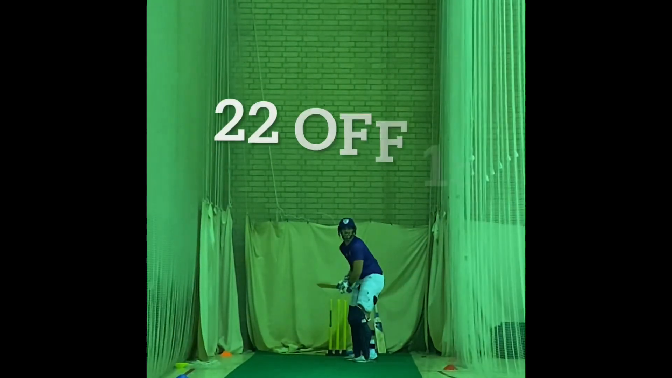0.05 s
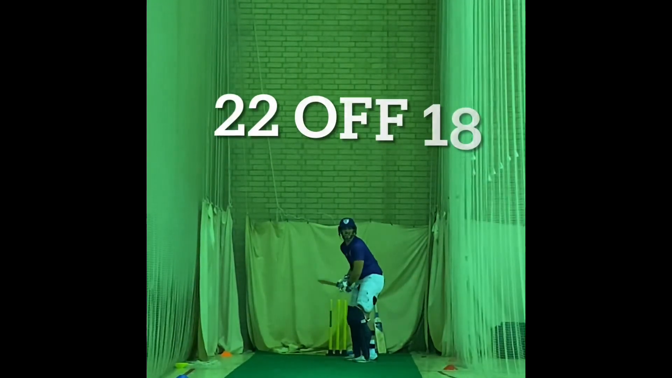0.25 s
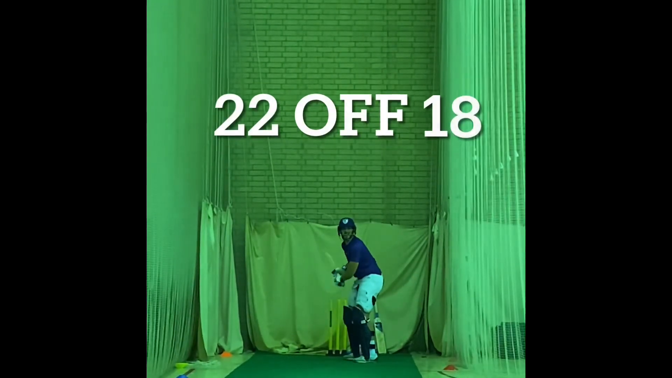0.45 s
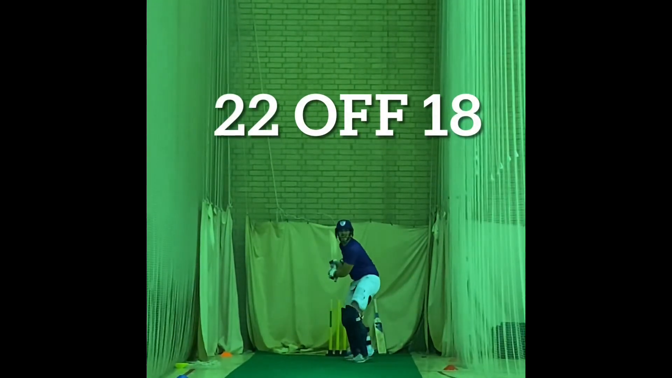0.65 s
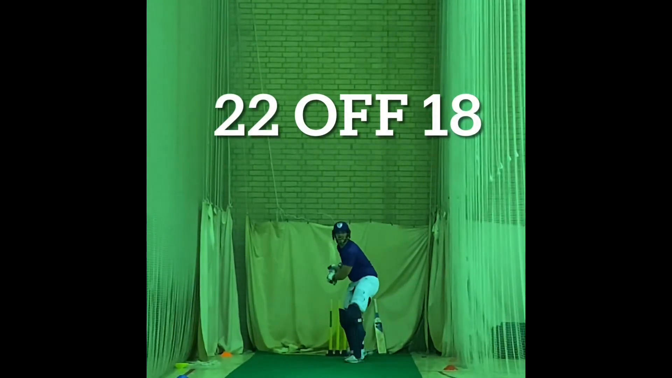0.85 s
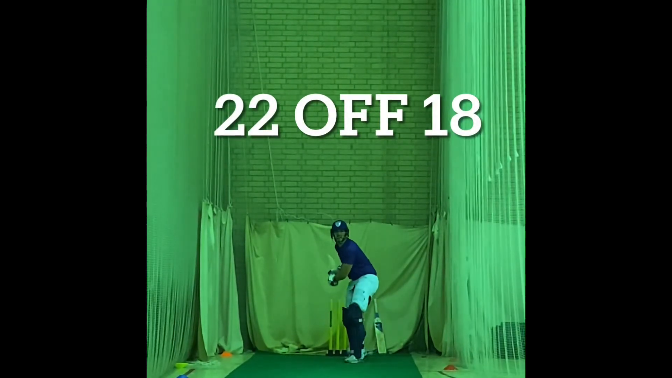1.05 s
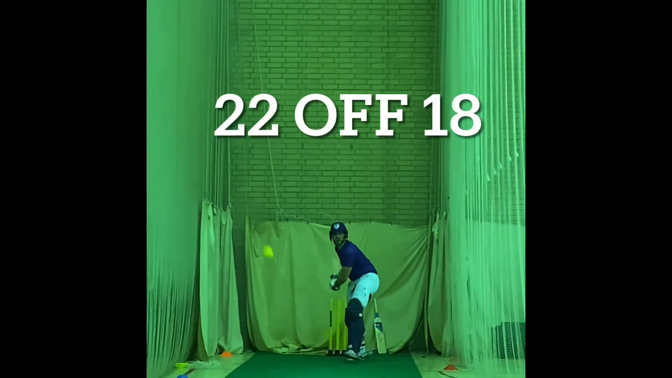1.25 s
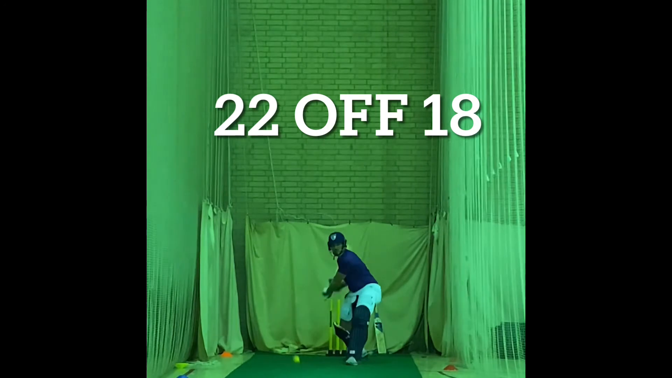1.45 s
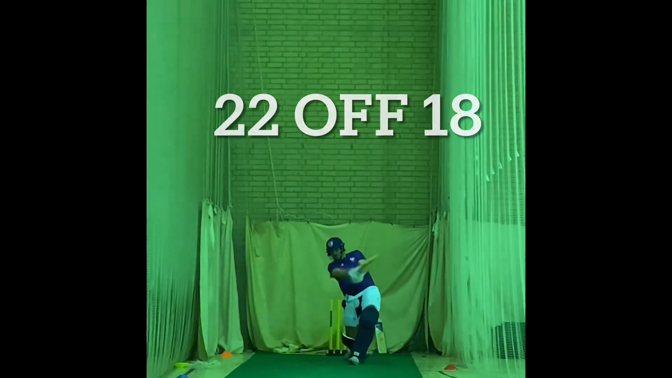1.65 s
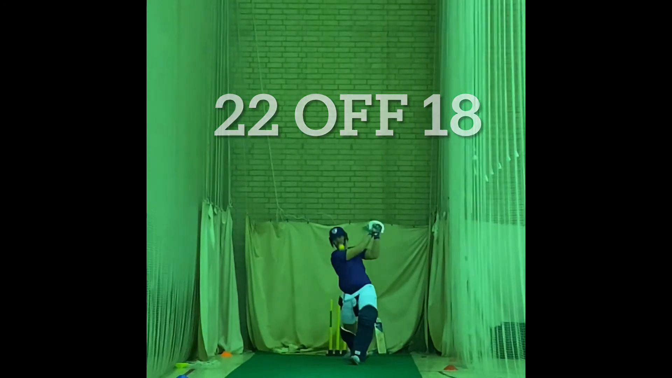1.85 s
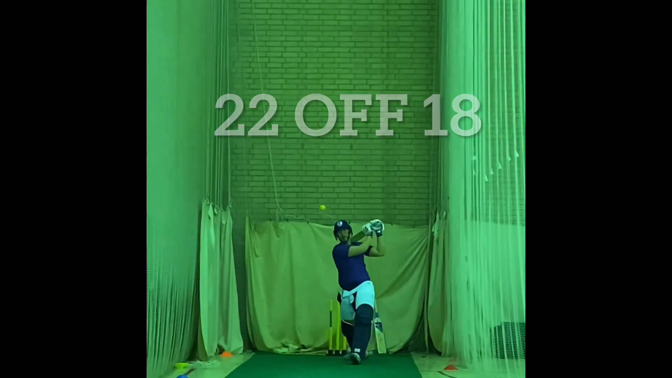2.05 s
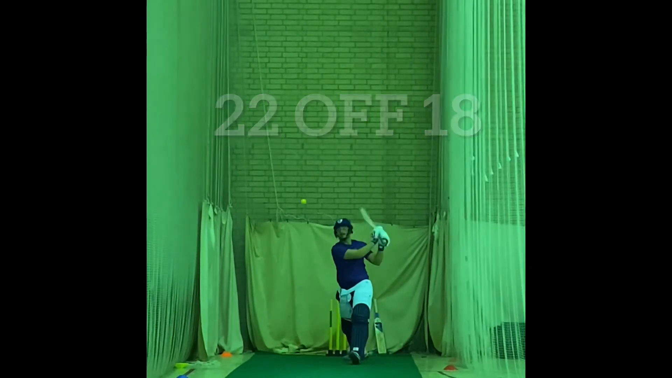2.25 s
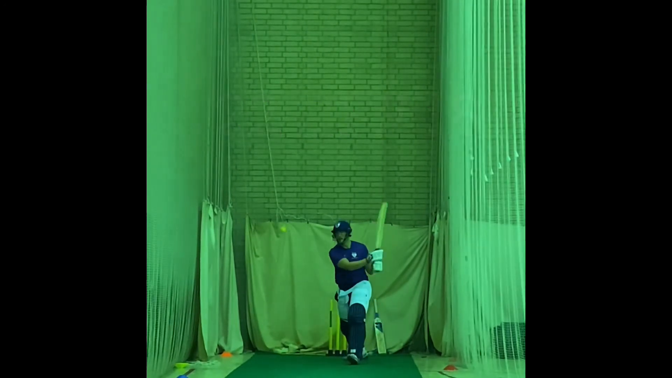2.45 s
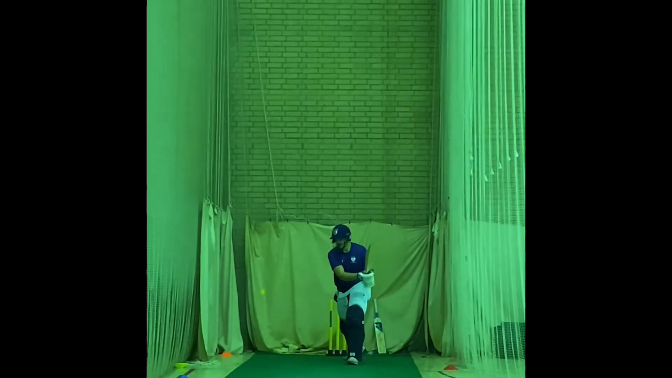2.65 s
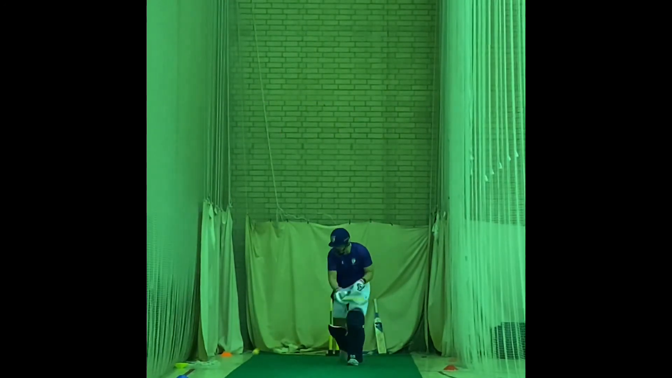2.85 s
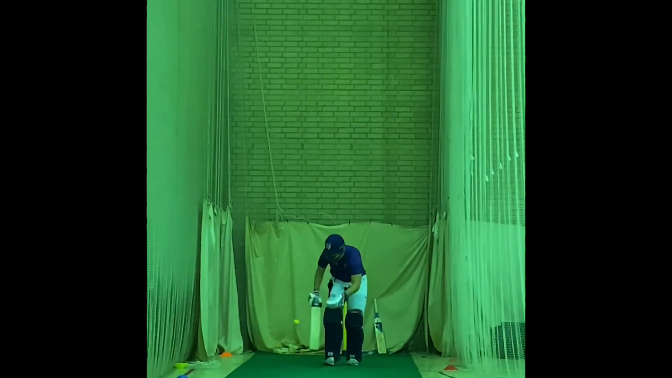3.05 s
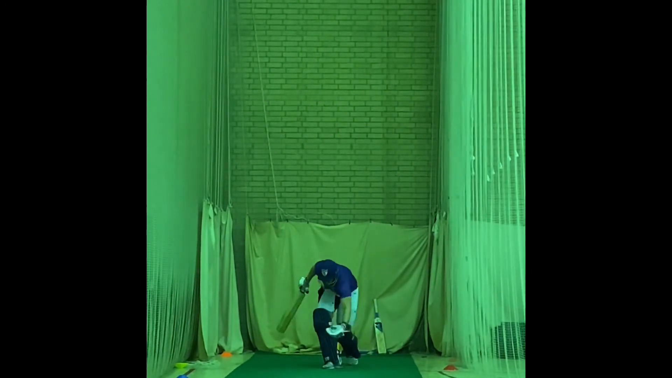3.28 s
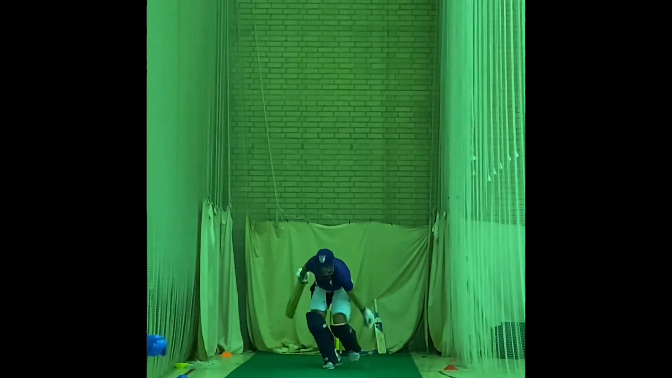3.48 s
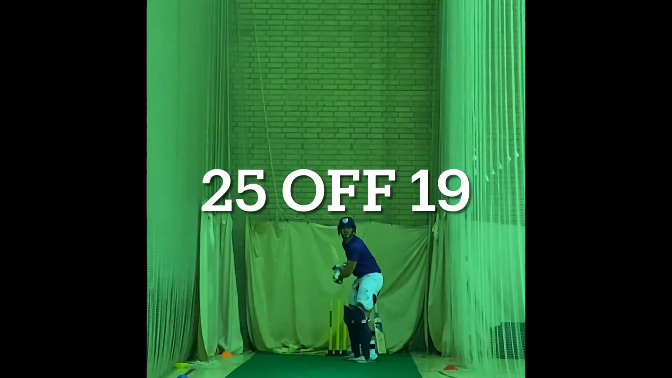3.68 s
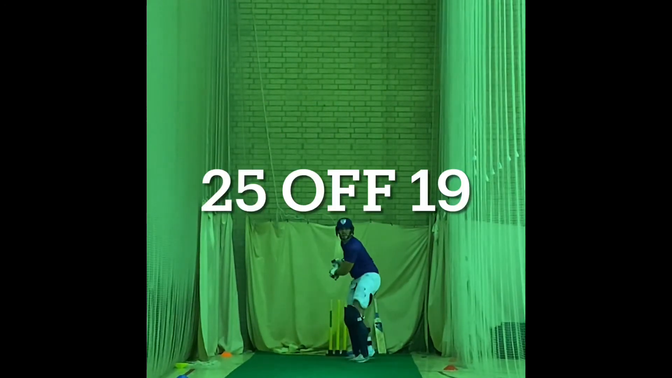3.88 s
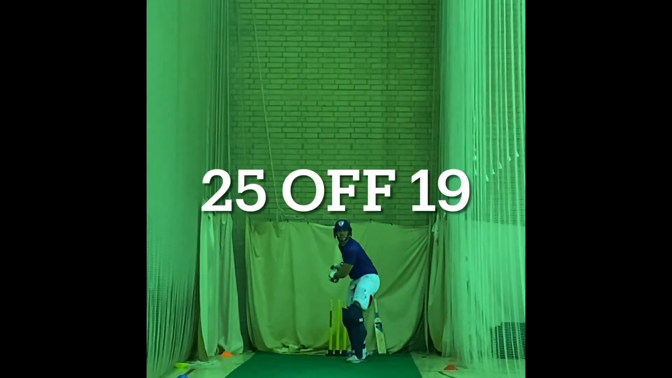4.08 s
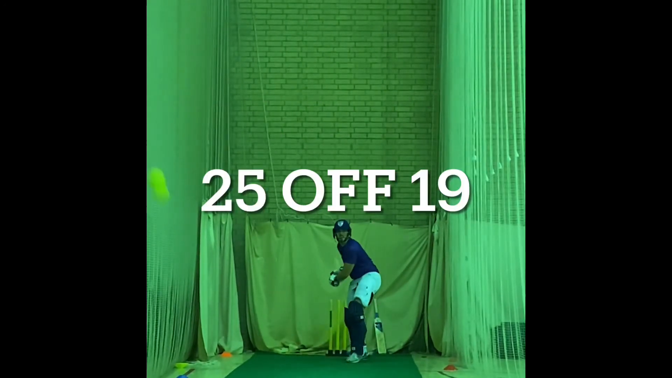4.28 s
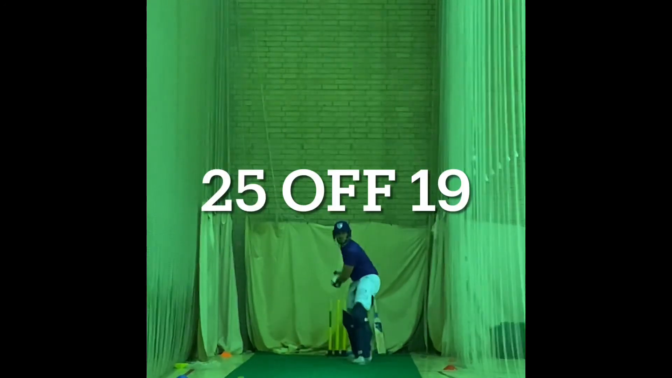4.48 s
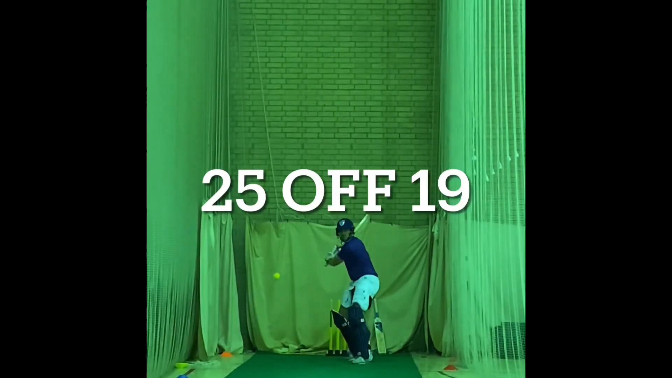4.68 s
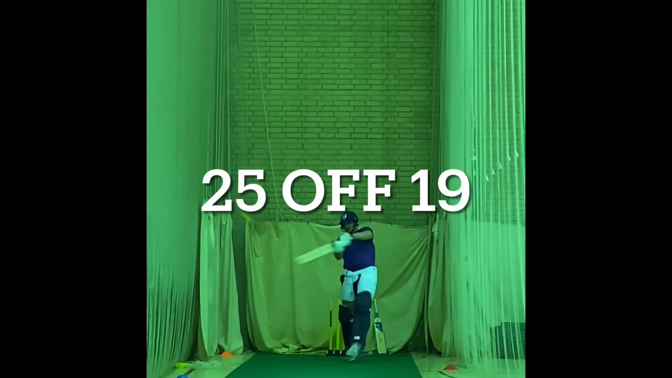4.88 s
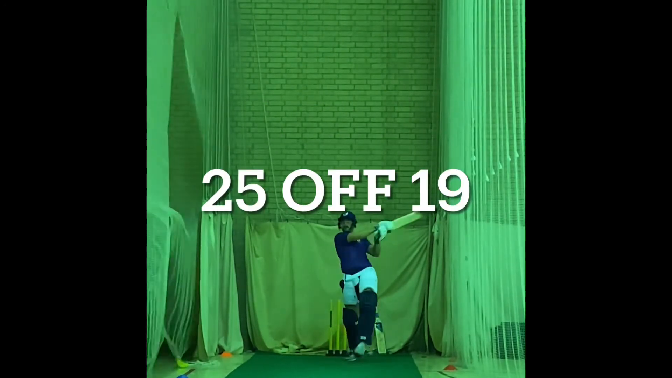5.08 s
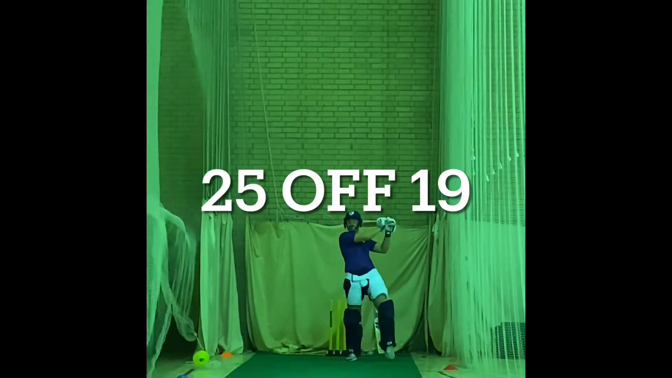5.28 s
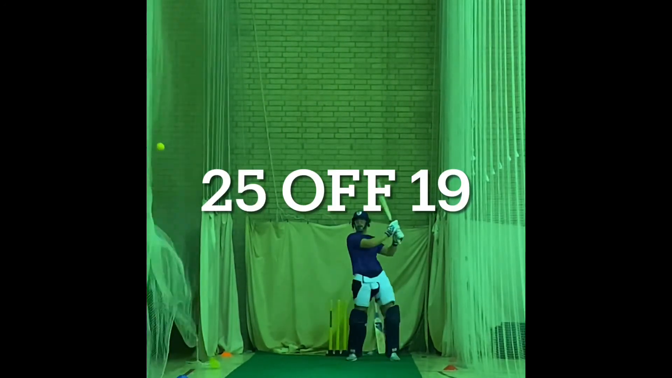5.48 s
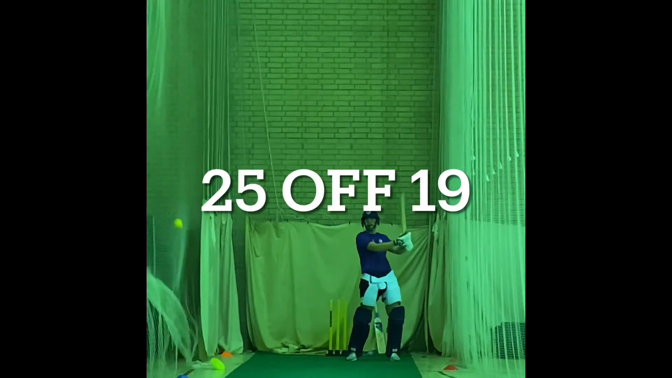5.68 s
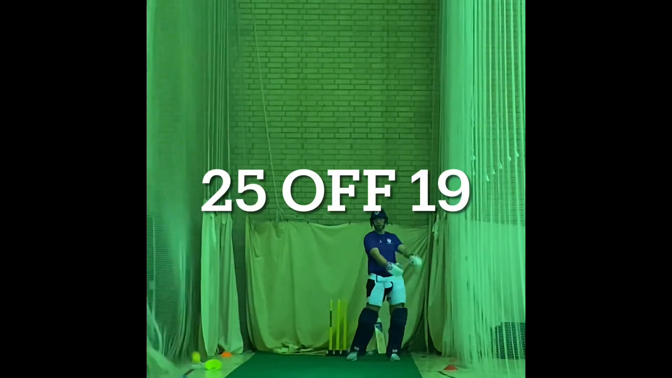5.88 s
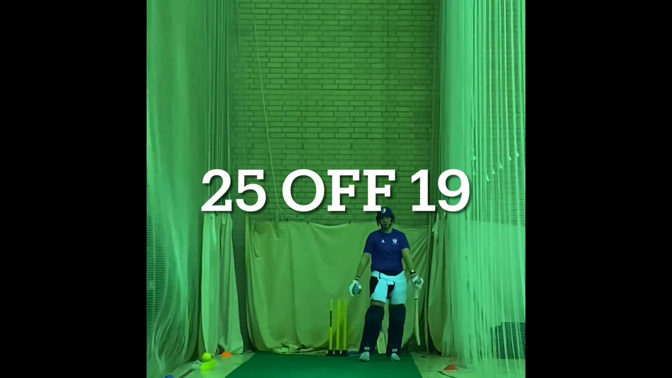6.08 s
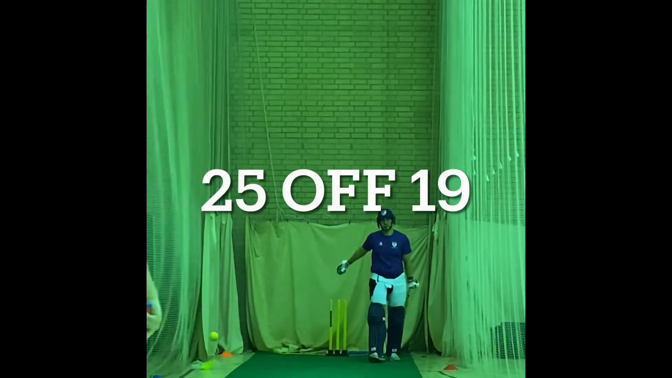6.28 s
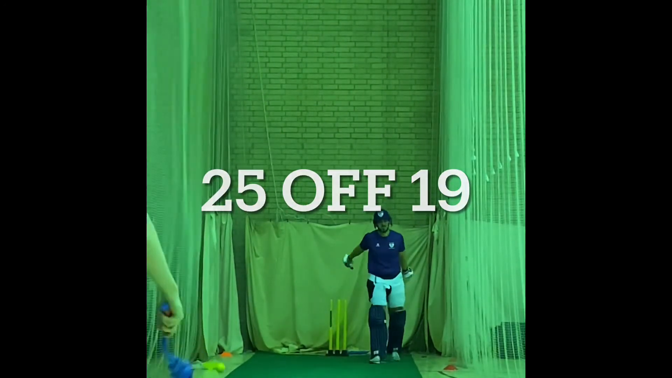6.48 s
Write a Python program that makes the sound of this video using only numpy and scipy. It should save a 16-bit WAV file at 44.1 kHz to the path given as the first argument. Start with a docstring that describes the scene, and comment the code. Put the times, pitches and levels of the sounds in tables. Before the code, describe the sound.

Two cricket shots in an indoor net lane, heard in stereo from down the lane. Gritty shoe taps precede each; a hollow floor thud, then a dry, woody crack that slaps off the walls and lingers for seconds. The first echo is cut short by a brief fade; the second shot is brighter and stronger, followed by net runners whirring and hollow floor knocks over a wavering hum.

```python
"""Cricket nets in an echoing hall

Two deliveries in a big sports hall, joined by a quick fade: a willow bat cracks as ringing blade modes
and clicks; feet and ball thud on a sprung floor that spreads each blow out by pitch, and low booms follow.
Shoes tap and scuff as gritty noise bursts; after the second shot the side net's runners whirr.
Decaying stereo noise makes the hall's slaps and long ring; a wavering hum and a rush of air lie beneath."""
import sys
import numpy as np
from scipy import signal
from scipy.fft import rfft, irfft, next_fast_len
from scipy.io import wavfile
from scipy.ndimage import uniform_filter1d, minimum_filter1d, map_coordinates

SR = 44100
rng = np.random.default_rng(int(sys.argv[2]) if len(sys.argv) > 2 else 0)


def digitize_waveform(pressure):
    """Quantize a signal to 16-bit integers and store it at the path in sys.argv[1].

    Rows of a 2-D input are taken as channels; values are limited to [-1, 1].
    """
    field = np.atleast_2d(pressure).T
    bounded = np.clip(field, -1, 1)
    quanta = np.round(bounded * 32767).astype(np.int16)
    wavfile.write(sys.argv[1], SR, quanta)


N = 287973
TIME = np.arange(N) / SR
SPLICE_S = 3.548  # the first delivery gives way to the second
CONTACT_S = .0002  # the ball flattens against blade or floor

# bat on ball: (time [s], blade level [dB], crack level [dB], signed distance from the sweet spot,
# echo level [dB], hollow ring in the echo [dB], echo tilt [dB per octave], end wall's delay [s],
# level of the clean returns [dB])
STROKES = [(1.4767, -4.2, -14.5, 1.3, -21.6, 1.5, -1.6, .0195, -2),
           (4.7741, -1.5, -12, 0, -20, 6.5, -.3, .0166, .5)]


def stroke(blade_db, crack_db, off_centre, echo_db, hollow_db, tilt, wall_s, mirror_db,
           snap_db=8, snap_tilt=1.3, splinter_db=-2, splinter_t60=.011):
    """A hard crack and the short ring of the blade's bending modes, doubled by the floor and the hall."""
    # bending modes: (pitch [Hz], level [dB], t60 [s], rise [s], gain per unit off the sweet spot [dB])
    modes = [(362, 12, .024, .0045, -5), (700, 2, .022, .002, 3), (1000, -7, .018, .0006, -2),
             (1290, -5.5, .018, .0007, -7), (2150, -14, .01, .0003, -2), (2750, -10, .009, .0003, 0),
             (3770, -10, .01, .0003, 7), (4350, -1, .008, .0005, 2), (4900, -9, .01, .0003, 3),
             (5710, -7, .01, .0003, -6), (6200, -18, .01, .0003, 3)]
    # spectrum of the crack: (frequency [Hz], level [dB per Hz])
    crack_spectrum = [(200, -18), (800, -4), (2500, -5), (4400, 0), (6000, -3), (8000, -12), (12000, -12),
                      (16000, -17)]
    # spectrum of the bat's echo: (frequency [Hz], level [dB per Hz])
    bat_echo = [(60, -30), (115, -25), (170, -6), (350, 0), (750, 0), (1050, -3), (1300, -7.5), (1700, -9),
                (2400, -5.5), (3100, -10), (4200, -7), (5600, -9.5), (7500, -16), (11000, -20),
                (15000, -29)]
    # clean returns: (time after the end wall's delay [s], blade level [dB], crack level [dB])
    mirrors = [(0, -12, -3), (.0025, -11, -1), (.0042, -14, -2), (.0066, -16, -3), (.0105, -20, -7),
               (.0482, -15, -4)]
    floor_s, floor_db = .0027, -4  # the crack's bounce off the floor

    t = np.arange(SR // 10) / SR
    blade = np.zeros(len(t))
    for hz, db, t60, rise, shift_db in modes:
        envelope = decay(t, t60) * (1 - np.exp(-(t / rise) ** 2))
        blade += amp(db + off_centre * shift_db) * np.sin(2 * np.pi * hz * t) * envelope

    splinter_envelope = decay(t, splinter_t60) * (1 - np.exp(-t / CONTACT_S))
    splinters = amp(splinter_db) * splinter_envelope * noise(len(t), colour(crack_spectrum))
    click = amp(snap_db) * snap(len(t), colour(crack_spectrum, snap_tilt))
    crack = amp(crack_db) * (click + splinters)

    hollow = resonant(colour(bat_echo, tilt), 750, hollow_db)
    out = amp(echo_db) * echo(lambda hz: hollow(hz) * uneven(hz),
                              slap_db=0, early_db=1.5, early_t60=.55, wall_s=wall_s)
    add(out, 0, amp(blade_db) * blade + crack)
    add(out, floor_s, amp(floor_db) * crack)
    for delay, ring_db, click_db in mirrors:
        bounce = amp(blade_db + ring_db) * blade + amp(click_db) * crack
        add(out, wall_s + delay, amp(mirror_db) * bounce)
    return out


def thud(knock_db, echo_db, tilt, knock_hz, boom_db, sole_db, spread=.19):
    """Bending waves in a sprung floor run faster at high pitch, so the boom arrives ms after the knock."""
    # spectrum of the knock: (frequency [Hz], level [dB per Hz])
    knock_spectrum = [(30, -35), (70, -5), (140, -1), (330, 0), (550, -8), (850, -24), (1500, -44),
                      (4000, -75), (15000, -120)]
    # spectrum of the boom in the hall: (frequency [Hz], level [dB per Hz])
    boom_spectrum = [(30, -42), (55, -12), (85, 1), (115, 2.5), (150, 1), (280, -1.7), (420, -7),
                     (600, -13), (850, -29), (1300, -44), (2400, -57), (9000, -92)]
    # spectrum of the sole's slap: (frequency [Hz], level [dB per Hz])
    slap_spectrum = [(200, -10), (550, -2), (900, 0), (1400, -1), (2200, -6), (3200, -9.5), (5500, -16),
                     (8000, -32), (11000, -39), (15000, -57)]
    boom_hz, knock_lift_db = 95, 6  # the floor's deep boom; the resonance lifted in each knock
    far_wall_s, far_wall_db = .062, -14  # the far wall returns each thud
    slap_trim_db, echo_slap_db = 1, 2  # added to the sole's level nearby and in the echo
    slap_rise_s = .0025  # the soft rubber takes this long to flatten

    n = SR // 4
    hz, t = np.fft.rfftfreq(n, 1 / SR), np.arange(n) / SR
    boards = resonant(colour(knock_spectrum, tilt), knock_hz, knock_lift_db, width=.3)
    # the delay shrinks with the root of the frequency
    dispersion = np.exp(-2j * np.pi * (2 * spread * np.sqrt(hz) - .003 * hz))
    knock = irfft(boards(hz) * dispersion, n)
    attack = 1 - np.exp(-(t / CONTACT_S) ** 2)
    fade_out = np.minimum(1, 2 * (1 - t / t[-1])) ** 2
    knock *= attack * fade_out / np.abs(knock).max()

    slap_envelope = t / slap_rise_s * np.exp(1 - t / slap_rise_s)
    slap = amp(sole_db + slap_trim_db) * noise(n, colour(slap_spectrum)) * slap_envelope

    deep = resonant(colour(boom_spectrum, tilt), boom_hz, boom_db, width=.35)

    def boom_and_slap(f):
        return np.hypot(deep(f), amp(sole_db + echo_slap_db) * colour(slap_spectrum)(f))
    out = amp(echo_db) * echo(boom_and_slap, slap_db=-12, early_db=1.5, early_t60=1.2)
    add(out, 0, amp(knock_db) * (knock + slap))
    add(out, far_wall_s, amp(knock_db + far_wall_db) * (knock + slap))
    return out


def blows():
    """Strokes, thuds and low booms with their echoes; the first delivery's echo ends at the splice."""
    # thuds on the floor, and low booms that follow some of them as probable returns off the walls;
    # the first is only a fading echo: (time [s], knock level [dB], echo level [dB],
    # tilt [dB per octave], knock pitch [Hz], lift of the deep boom [dB],
    # sole's slap before its trims [dB])
    thuds = [(-1.2, -12, -28.5, -2.6, 300, -3, -66), (1.389, -13, -25, -2.3, 300, 3, -30),
             (1.496, -3.5, -16.2, -.5, 380, 0, -58), (1.585, -9, -30, -3, 100, 0, -60),
             (1.657, -7, -29, -2, 170, 0, -60), (1.828, -13, -36, -2, 200, 0, -60),
             (2.7192, -8, -22.8, -1, 420, -1, -66), (2.797, -12, -34, -2, 160, 0, -60),
             (4.3513, -2, -19.7, 0, 330, -3, -32), (4.431, -9.5, -28, -3, 140, -2, -50),
             (5.8525, -5.5, -23.3, -.1, 300, 1, -25), (5.953, -13, -30, -2, 140, 2, -55),
             (6.095, -15, -35, -2, 180, -4, -55)]
    first, second = np.zeros((2, 2, N))
    for source, rows in (stroke, STROKES), (thud, thuds):
        for s, *blow in rows:
            add(first if s < SPLICE_S else second, s, source(*blow))
    return np.where(TIME < SPLICE_S, first, second)


def shoes(grit_db=2.2, slip_db=2.8, clap_db=7, wet_db=-11.5):
    """Rubber soles tap and slide in gritty slips; the runner's weight lands just after each tap."""
    # steps, heel and toe: (time [s], tap level [dB], footfall level [dB], clap pitch [Hz], t60 [s])
    steps = [(.006, -37, -39, 850, .07), (.388, -41, -46, 2300, .1), (.414, -35.5, -30, 2000, .1),
             (.728, -34.5, -35, 1100, .075), (.787, -49, -38, 2600, .085), (.862, -35, -48, 1400, .1),
             (1.222, -37, -34, 1700, .06), (1.268, -34, -31, 900, .09), (3.583, -40.5, -40, 1000, .06),
             (3.601, -41, -31, 1200, .085), (3.859, -49, -36, 1000, .06), (3.915, -39, -42, 1700, .085),
             (4.064, -32.5, -52, 1300, .075), (4.328, -41, -45, 900, .085), (4.343, -36, -33, 1200, .085)]
    # sliding soles and brushing cloth: (middle [s], level [dB], pitch [Hz], squeak at that pitch [dB],
    # tilt [dB per octave], half length [s])
    scuffs = [(.185, -58, 4200, 3, 3, .04), (.888, -39.5, 1600, 5.5, 1, .033),
              (2.745, -59, 4200, 3, 2, .025), (3.19, -60, 5200, 5, 2, .028), (3.44, -61, 3000, 3, 1.5, .03),
              (3.608, -47, 2700, 5, 1.3, .02), (3.881, -46.5, 5400, 17, 1, .012),
              (4.084, -40.5, 1400, 4, 1.4, .033), (5.924, -42.5, 4300, 10, -1.2, .011)]
    # small ticks of pads, gloves and laces: (time [s], level [dB], pitch [Hz])
    ticks = [(.243, -49, 4000), (.423, -40, 2400), (.661, -48, 2400), (.732, -39, 1900), (1.231, -39, 2600),
             (1.277, -36, 2300), (3.161, -53, 4200), (3.568, -38, 2300), (3.677, -47.5, 4300),
             (3.747, -42, 2900), (3.859, -44, 2000), (4.082, -39, 2700), (5.882, -44, 3600)]
    # spectrum of a sole: (frequency [Hz], level [dB per Hz])
    sole = [(200, -12), (550, -2.5), (900, .5), (1400, 0), (2200, -2.5), (3200, -8), (5500, -12.5),
            (7200, -25), (12500, -25), (15500, -29)]
    # spectrum of the landing weight: (frequency [Hz], level [dB per Hz])
    footfall = [(40, -25), (90, -6), (135, 0), (190, -9), (300, -28), (1000, -55), (4000, -85)]
    tap_rise_s, weight_s = .0018, .011  # a tap's attack; the weight peaks this long after it
    tick_t60_s = .035
    grains_per_s, grain_share = 1400, .35  # grit under the soles, and its share of their power
    # tilt is zero at the neutral pitch; brighten is dB per octave for each octave above it
    neutral_hz, brighten = 2100, 1.6

    dry, t = np.zeros(N), np.arange(SR // 6) / SR

    def rubber(hz, tilt, lift_db, rough_db):
        """Smooth friction noise mixed with sparse grains, its level shaken at random."""
        gain = resonant(colour(sole, tilt), hz, lift_db)
        hits = rng.random(len(t)) < grains_per_s / SR
        grains = unit(filtered(rng.standard_normal(len(t)) * hits, gain))
        friction = noise(len(t), gain)
        mix = np.sqrt(1 - grain_share) * friction + np.sqrt(grain_share) * grains
        return mix * amp(rough_db * wobble(t, 250))

    def clap(hz):
        """A sole's texture, brighter the higher its pitch."""
        return rubber(hz, brighten * np.log2(hz / neutral_hz), clap_db, grit_db)

    weight = t / weight_s * np.exp(1 - t / weight_s)
    for s, tap_db, foot_db, hz, t60 in steps:
        tap = decay(t, t60) * (1 - np.exp(-t / tap_rise_s)) * clap(hz)
        landing = weight * noise(len(t), colour(footfall))
        add(dry, s, amp(tap_db) * tap + amp(foot_db) * landing)
    middle = t.mean()
    for s, db, hz, lift_db, tilt, half_s in scuffs:
        slide = np.exp(-((t - middle) / half_s) ** 2)
        add(dry, s - middle, amp(db) * slide * rubber(hz, tilt, lift_db, slip_db))
    for s, db, hz in ticks:
        add(dry, s, amp(db) * decay(t, tick_t60_s) * clap(hz))

    hall = echo(np.ones_like, slap_db=-3, early_db=2, early_t60=.5)
    wet = signal.fftconvolve(dry[None], hall / np.linalg.norm(hall[0]), axes=1)[:, :N]
    return dry + amp(wet_db) * wet


def net(rattle_db=1.5):
    """The ball drags the side net, whose runners whirr along their wire as unevenly pulsing noise."""
    # the pull on the net: (time [s], level [dB])
    pull = [(4.9, -55), (5.02, -32.5), (5.32, -30), (5.7, -32.5), (6, -42), (6.5, -55)]
    # spectrum of the runners: (frequency [Hz], level [dB per Hz])
    runners = [(400, -40), (570, -14), (670, 0), (740, -3), (820, 0), (920, -9), (1200, -22), (1450, -13),
               (1750, -26), (4000, -48), (15000, -100)]
    level_db = np.interp(TIME, *np.transpose(pull), left=-120)
    return amp(level_db + rattle_db * wobble(TIME, 25)) * diffuse(N, colour(runners))


def ventilation(drift_hz=.35, waver_db=.8):
    """A fan hum of wandering pitch and level in a soft rush of air that swells around each stroke."""
    # hum before its waver: (time [s], level [dB])
    hum_level = [(0, -39), (1.3, -37), (3.4, -40), (4.2, -47), (5.6, -32.5), (6.5, -40.5)]
    # spectrum of the rush of air: (frequency [Hz], level [dB per Hz])
    air = [(20, -18), (45, -5.5), (70, 0), (110, -6.5), (200, -12), (350, -20), (600, -24), (1400, -30),
           (2800, -34), (4000, -36), (5600, -36.5), (7500, -48), (11500, -50), (16000, -64)]
    hum_hz, air_db = 70.3, -50.5
    swell_db, swell_rise_s, swell_fall_s = 6, 1.45, .6  # peaks at the stroke

    phase = 2 * np.pi * np.cumsum(hum_hz + drift_hz * wobble(TIME, 5)) / SR
    level_db = np.interp(TIME, *np.transpose(hum_level)) + waver_db * wobble(TIME, 5)
    hum = np.sqrt(2) * np.sin(phase) * amp(level_db)
    swell = sum(np.interp(TIME, [s - swell_rise_s, s, s + swell_fall_s], [0, 1, 0]) for s, *_ in STROKES)
    return hum + amp(air_db + swell_db * swell) * diffuse(N, colour(air))


def echo(gain, slap_db, early_db, early_t60, wall_s=.017, clump_db=1.9, merge_s=.6):
    """The hall's answer: wall slaps, a quick fall in the net lane, then a long tail that darkens."""
    # scattered slaps: (time after the end wall's delay [s], level over the tail [dB], t60 [s])
    walls = [(0, 7, .045), (.047, -3, .05)]
    # ring of the hall: (frequency [Hz], t60 [s])
    ring_times = [(70, 3.8), (100, 2.1), (122, 2.4), (170, 5), (260, 5.6), (420, 5.5), (700, 5), (1200, 4),
                  (2000, 3.15), (3200, 2.6), (5000, 1.9), (7000, 1.1), (9500, .76), (14000, .46)]
    build_up_db = -20  # the echo starts this low and grows until the end wall answers

    n = 5 * SR // 2
    t = np.arange(n) / SR
    # slaps and lane are powers relative to the tail
    slaps = sum((amp(db + slap_db) * decay(t - wall_s - delay, t60)) ** 2 for delay, db, t60 in walls)
    lane = (amp(early_db) * decay(t, early_t60)) ** 2
    # nets and drapes scatter ever more until the end wall answers
    build_up = amp(build_up_db * np.maximum(0, 1 - t / wall_s))
    # reflections come in bunches, then merge
    clumps = amp(clump_db * wobble(t, 250) / (1 + t / merge_s))
    reflections = diffuse(n, gain, build_up * clumps * np.sqrt(1 + lane + slaps))
    hz, frames, z = signal.stft(reflections, SR, nperseg=2048)
    ringing = z * decay(frames, along(ring_times, hz)[:, None])
    return signal.istft(ringing, SR)[1][:, :n]


def uneven(hz):
    """Gain of scattered narrow peaks that make the echo's treble uneven."""
    # peaks: (centre [Hz], lift [dB])
    peaks = [(1322, 3.5), (2338, 4.5), (2640, 3.5), (2755, 3), (2900, 3), (3108, 3), (3670, 3.5), (4030, 2),
             (4380, 2.5), (5190, 5.5), (5387, 3), (5790, 5)]
    peak_width_hz = 20
    return amp(sum(db / (1 + ((hz - centre) / peak_width_hz) ** 2) for centre, db in peaks))


def snap(n, gain):
    """A single sharp click of the given colour, its energy packed at the start, of peak 1."""
    cepstrum = irfft(np.log(gain(np.fft.rfftfreq(n, 1 / SR)) + 1e-6), n)
    # folding the cepstrum forward gives minimum phase
    fold = np.r_[1, np.full(n // 2 - 1, 2), np.zeros(n - n // 2)]
    click = irfft(np.exp(rfft(cepstrum * fold)), n)
    return click / np.abs(click).max()


def diffuse(n, gain, envelope=1):
    """Coloured stereo noise arriving from all sides, of rms 1 where the envelope is 1."""
    # stereo width: (frequency [Hz], side against mid [dB])
    side_level = [(60, -44), (95, -34), (160, -21), (450, -8), (750, -2.5), (1100, -2.5), (2000, -10.5),
                  (3300, -18), (4400, -6.5), (7400, -20), (15000, -14)]

    def split(hz):
        side = amp(along(side_level, hz))
        return unit(gain(hz)) * np.array([np.ones_like(side), side]) / np.hypot(1, side)
    mid, side = filtered(envelope * rng.standard_normal((2, n)), split)
    return np.array([mid + side, mid - side])


def noise(n, gain):
    """Coloured noise of rms 1."""
    return unit(filtered(rng.standard_normal(n), gain))


def wobble(t, rate):
    """A smooth random curve, rate knots a second."""
    return map_coordinates(rng.standard_normal(2048), [t * rate], mode="mirror")


def resonant(gain, centre_hz, db, width=.2):
    """A gain curve lifted by db around one frequency; width is a share of that frequency."""
    return lambda hz: gain(hz) * amp(db / (1 + ((hz / centre_hz - 1) / width) ** 2))


def colour(points, tilt=0):
    """Gain against frequency for a spectrum tilted about 500 Hz."""
    return lambda hz: amp(along(points, hz) + tilt * np.log2((hz + 20) / 500))


def along(points, hz):
    """(Hz, value) points read on a log axis."""
    f, v = np.transpose(points)
    return np.interp(np.log(hz + 1), np.log(f), v)


def decay(t, t60):
    """Silent before t = 0, then 60 dB down every t60."""
    return (t >= 0) * np.exp(-np.log(1000) * np.clip(t / t60, 0, 10))


def filtered(x, response):
    """x times a response of frequency."""
    n = x.shape[-1]
    m = next_fast_len(n + 4096, True)
    return irfft(rfft(x, m) * response(np.fft.rfftfreq(m, 1 / SR)), m)[..., :n]


def add(out, s, x):
    """Mix x into out from time s; what falls outside is cut."""
    i = round(s * SR)
    x = x[..., max(-i, 0):N - i]
    out[..., max(i, 0):max(i, 0) + x.shape[-1]] += x


def amp(db):
    """Decibels to gain."""
    return np.exp(np.asarray(db) * (np.log(10) / 20))


def unit(x):
    """Scale to rms 1."""
    return x / np.sqrt(np.mean(x ** 2) + 1e-20)


def scene():
    """Everything in the hall, leaning a little to the right in the low mids."""
    # stereo lean: (frequency [Hz], left over right [dB])
    lean = [(90, 0), (250, -1.4), (500, -2.2), (1000, 0)]
    mix = blows() + ventilation() + shoes() + net()
    return filtered(mix, lambda hz: amp(along(lean, hz) * np.array([[.5], [-.5]])))


def record(dry):
    """The channels part in treble phase, a fast limiter holds peaks, and the level dips at the splice."""
    # phase between the channels: (frequency [Hz], lead of the left [radians])
    phase_lead = [(0, 0), (600, .1), (3300, .1), (5400, .6), (7400, 3.14), (10400, 6.28), (13700, 9.42),
                  (16500, 12.57)]
    low_cut_hz, top_hz = 33, 15700

    def part(hz):
        return np.exp(.5j * np.interp(hz, *np.transpose(phase_lead)) * np.array([[1], [-1]]))
    pair = filtered(dry, part)
    needed = np.minimum(1, .9 / (np.abs(pair).max(axis=0) + 1e-9))
    limiter = uniform_filter1d(minimum_filter1d(needed, size=25), size=25)
    # 40 ms down, 20 ms up
    fade = np.minimum(1, np.abs(TIME - SPLICE_S) / np.where(TIME < SPLICE_S, .04, .02)) ** 1.5

    def band(hz):
        low_cut = 1 - 1 / (1 + (hz / low_cut_hz) ** 4)
        return low_cut / (1 + (hz / top_hz) ** 80)
    return filtered(pair * limiter * fade, band)


dry = scene()
out = record(dry)
digitize_waveform(out)
```